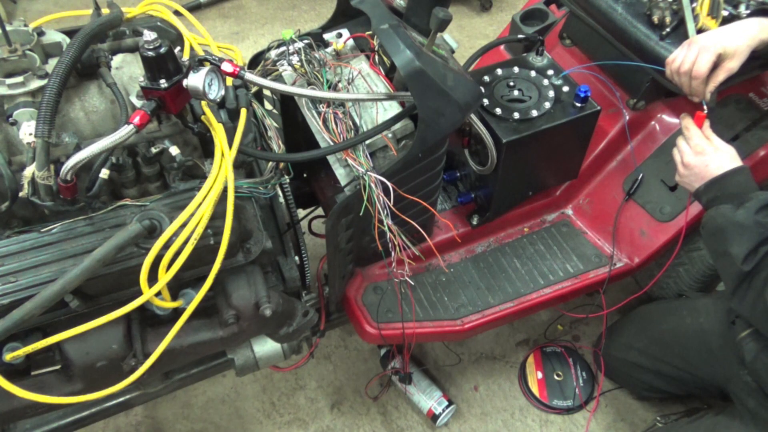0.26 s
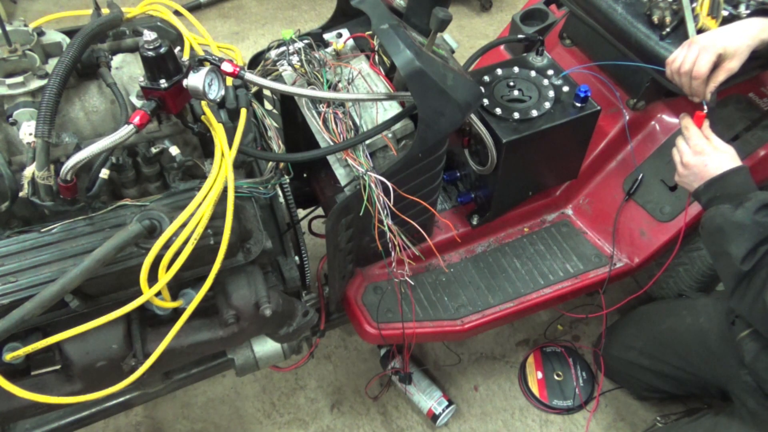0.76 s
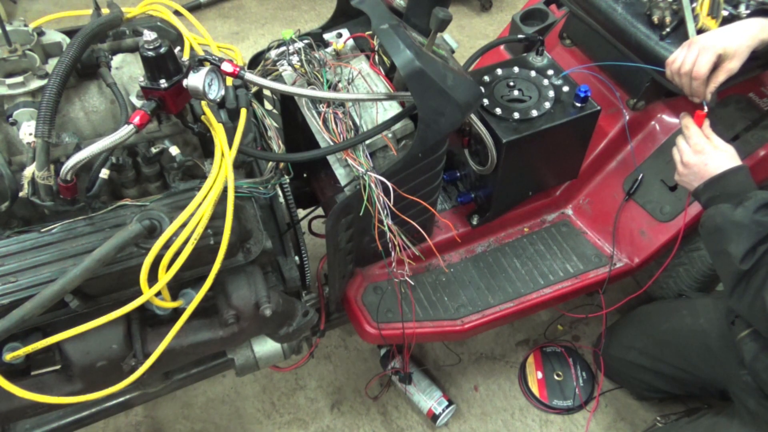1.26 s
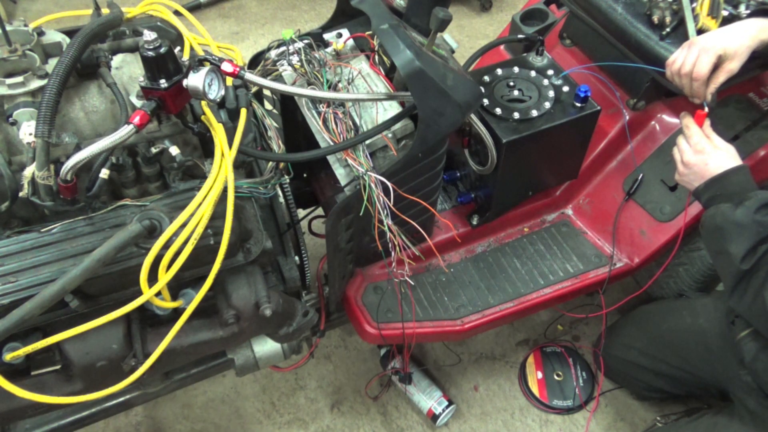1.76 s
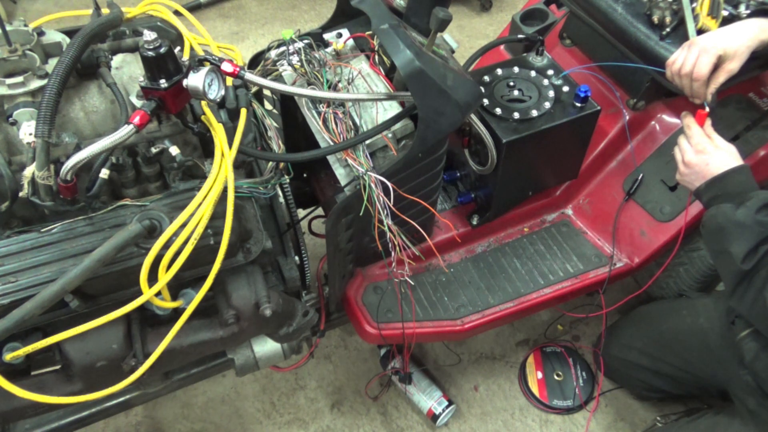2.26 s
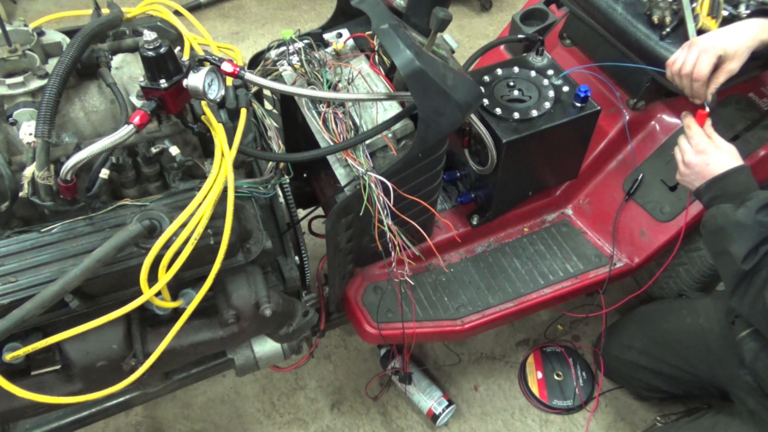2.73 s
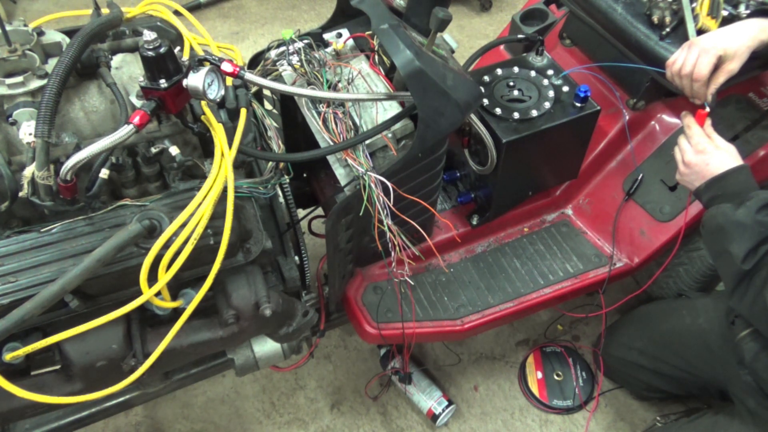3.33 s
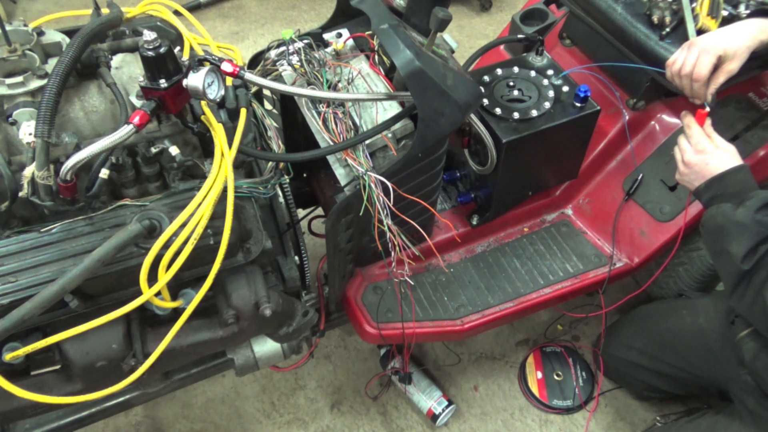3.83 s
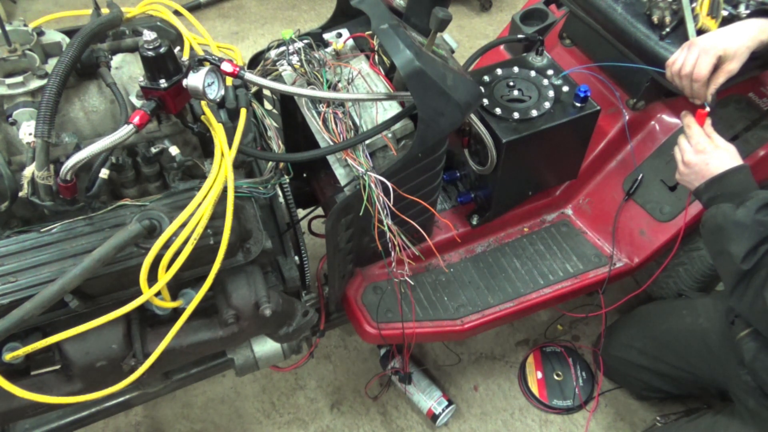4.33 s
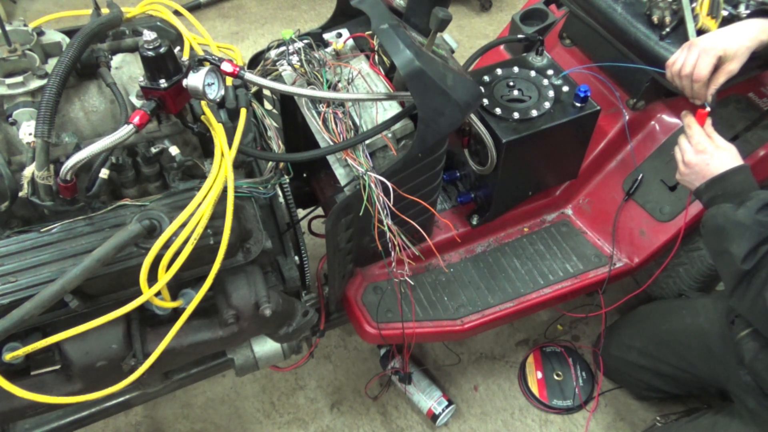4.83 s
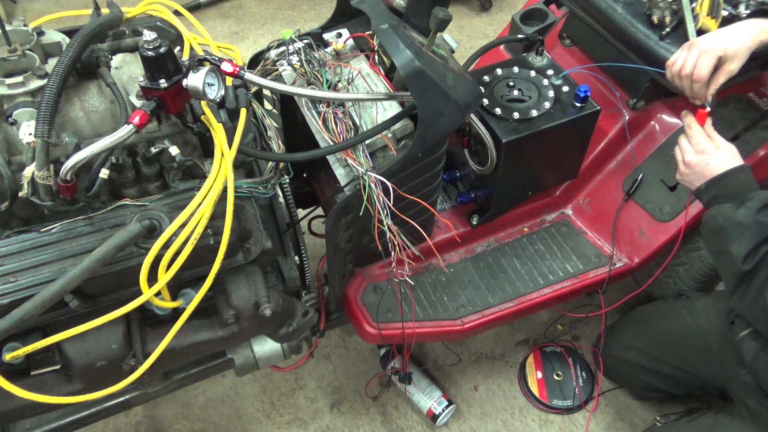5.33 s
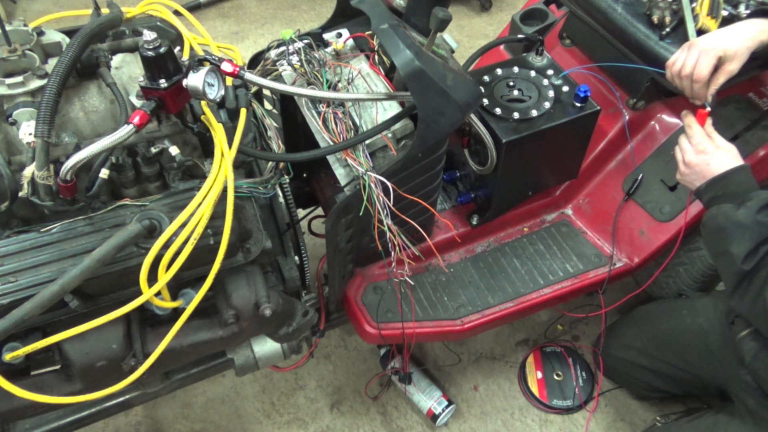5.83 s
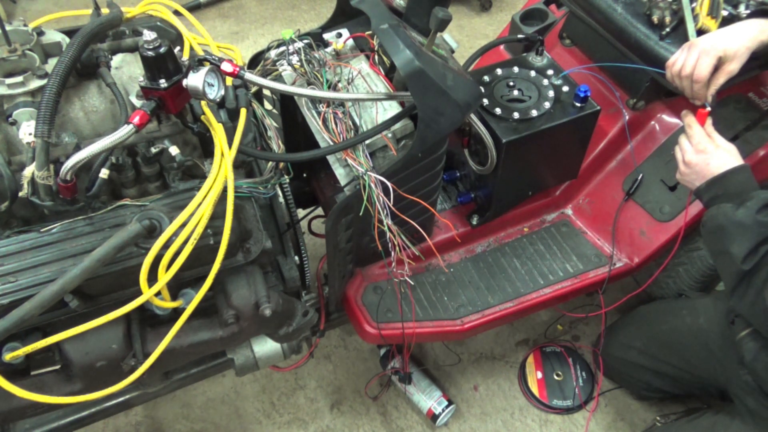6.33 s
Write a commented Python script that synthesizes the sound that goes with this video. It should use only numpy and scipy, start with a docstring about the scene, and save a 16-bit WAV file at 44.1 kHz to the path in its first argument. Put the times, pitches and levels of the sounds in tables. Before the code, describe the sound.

A small electric fuel pump starts in fits, with crackling sparks, thin metallic ticks and light ringing knocks between brief hissing bursts. After nearly two seconds it catches and keeps going, buzzing and whining over a frothy fizz and faint gurgle. Its tone slides gradually downward and levels off near the end as the hiss eases. The sound is fairly close, with slight workshop reflections and faint room noise.

```python
"""In a workshop, an electric fuel pump is run from hand-held wires.
The contact sparks and drops out a few times, then holds: the pump churns air and fuel with a rough hiss.
Its buzz and whine, multiples (orders) of the rotor speed, sink in pitch as pressure builds, then settle.
Fuel tank, body panels and the pump's metal can ring along."""
import sys
import numpy as np
from scipy import signal
from scipy.fft import rfft, irfft
from scipy.io import wavfile
from scipy.ndimage import uniform_filter1d

SR = 44100
rng = np.random.default_rng(int(sys.argv[2]) if len(sys.argv) > 2 else 0)


def to_wav(sig):
    """Store sig (one row per channel, or 1-D mono) as 16-bit WAV at the path in sys.argv[1].

    Samples outside -1..1 are clipped; the rate is SR.
    """
    pcm = np.clip(np.atleast_2d(sig), -1, 1) * 32767
    pcm = np.round(pcm).astype(np.int16)
    wavfile.write(sys.argv[1], SR, pcm.T)  # frames by channels


N = 290178
TIME_S = np.arange(N) / SR
BINS_HZ = np.maximum(np.arange(N // 2 + 1) * SR / N, 1)


def from_db(db):
    """Decibels to gain."""
    return 10 ** (np.asarray(db) / 20)


def unit_rms(x):
    """Scale to rms 1."""
    return x / np.sqrt(np.mean(x ** 2) + 1e-20)


def curves(rows):
    """Each value column of (time [s], values...) at every sample."""
    times_s, *columns = np.transpose(rows)
    return [np.interp(TIME_S, times_s, column) for column in columns]


def colour(points):
    """Gain per bin from (frequency [Hz], level [dB])."""
    hz, db = np.transpose(points)
    return from_db(np.interp(np.log(BINS_HZ), np.log(hz), db))


def resonances(modes):
    """Power per bin from (frequency [Hz], width [Hz], peak [dB])."""
    return sum(from_db(db) ** 2 / (1 + (2 * (BINS_HZ - hz) / width_hz) ** 2)
               for hz, width_hz, db in modes)


def noise(gain):
    """Noise shaped by a gain per bin, rms 1."""
    return unit_rms(irfft(rfft(rng.standard_normal(N)) * gain, N))


def drift(rate_hz):
    """Random wander below about rate_hz, rms 1."""
    hop, warmup = 40, 2000
    pole = np.exp(-2 * np.pi * hop * rate_hz / SR)
    white = rng.standard_normal(N // hop + warmup + 2)
    slow = signal.lfilter([1], [1, -2 * pole, pole * pole], white)[warmup:]
    return np.interp(np.arange(N) / hop, np.arange(len(slow)), unit_rms(slow))


def reflections(x, t60_s):
    """Dense dying echoes of x off the floor and nearby things, unit energy gain."""
    t = TIME_S[:SR // 2]
    echoes = rng.standard_normal(len(t)) * from_db(-60 * t / t60_s) * (t > .002)
    return signal.fftconvolve(x, echoes / np.linalg.norm(echoes))[:N]


def echo_ripple(strength):
    """Gain per bin: echoes off the floor and near panels ripple the spectrum."""
    t = TIME_S[:SR // 60]
    echoes = rng.standard_normal(len(t)) * np.exp(-t / .004) * (t > .002)
    return np.abs(1 + strength * rfft(echoes / np.linalg.norm(echoes), N)) / np.hypot(1, strength)


def stereo(mid, side_db, shift_db):
    """Left and right differ slightly in phase, level and reflections."""
    # stereo width: (frequency [Hz], relative side level [dB])
    width = [(60, -21), (200, -18.5), (330, -22), (500, -25.5), (770, -15), (1170, -8.5), (1790, -14.5),
             (2700, -15.5), (4200, -83), (6400, -78), (8500, -47), (9800, -12.5), (12000, -46),
             (15000, -45)]
    # balance: (frequency [Hz], left minus right [dB])
    balance = [(60, -.3), (300, -.2), (600, .9), (1200, 1.3), (2200, .4), (4500, .1), (8500, -.4),
               (13000, 0)]
    shifted = from_db(shift_db) * 1j * rfft(mid)
    side = from_db(side_db) * colour(width) * (shifted + rfft(reflections(mid, t60_s=.73)))
    lean = np.sqrt(colour(balance))
    return irfft([(rfft(mid) + side) * lean, (rfft(mid) - side) / lean], N)


def workshop(air_db):
    """Still air with a faint mains hum."""
    # room noise: (frequency [Hz], relative density [dB])
    room_spectrum = [(15, -44), (25, -34), (49, -20), (91, -8.5), (241, -6.5), (472, -11), (653, -9),
                     (727, -21), (1000, -9.5), (1350, -12.5), (1920, -13.5), (2650, -17), (15700, -30)]
    # hum lines: (frequency [Hz], rms level [dB])
    hum_lines = [(479, -60.5), (720, -60), (840, -60.5), (1200, -63.5), (1319, -63), (1384, -65),
                 (2638, -68)]
    hum = sum(from_db(db) * np.sqrt(2) * np.cos(2 * np.pi * hz * TIME_S + .09 * drift(14))
              for hz, db in hum_lines)
    return from_db(air_db) * noise(colour(room_spectrum)) + hum


def flow_rumble():
    """Low rumble of the flow."""
    # rumble: (time [s], level [dB])
    levels = [(0, -76), (1.2, -52), (2.2, -62), (3.0, -54), (4.3, -54.5), (5.2, -56), (6.58, -54)]
    level_db, = curves(levels)
    spectrum = [(20, -9), (45, -11), (75, 2.5), (100, -7), (135, 0), (220, -32), (600, -53), (2000, -90)]
    return from_db(level_db) * noise(colour(spectrum))


def mount_rattle(gain_db, grain_db):
    """The unloaded pump shakes unevenly in its mounting."""
    # mounting modes: (frequency [Hz], width [Hz], relative peak [dB])
    modes = [(168, 22, -5), (212, 22, -5), (275, 40, -12), (356, 24, 3), (492, 26, 2), (810, 30, -5),
             (1325, 50, -5), (1480, 50, -5), (1830, 160, -9), (2250, 200, -14)]
    # shaking: (time [s], relative level [dB])
    shake = [(.1, -70), (.125, -38), (.22, -37.5), (.3, -33.5), (.4, -37), (.54, -43), (.63, -39.5),
             (.81, -47), (.89, -37.5), (1.0, -44), (1.15, -66), (1.31, -70), (1.33, -37), (1.46, -48),
             (1.52, -44), (1.63, -49), (1.7, -43), (1.95, -46), (2.1, -75)]
    shake_db, = curves(shake)
    highpass = 1 / np.sqrt(1 + (140 / BINS_HZ) ** 16)
    envelope = from_db(gain_db + shake_db + grain_db * drift(40))
    return envelope * noise(np.sqrt(resonances(modes)) * highpass)


def wire_ticks():
    """The wire end flicks the terminal: thin metallic ticks."""
    # flicks: (time [s], level [dB])
    flicks = [(0.765, -33), (1.018, -33), (1.488, -36)]
    # terminal modes: (frequency [Hz], relative level [dB], t60 [s])
    modes = [(4750, -9, .05), (6380, 0, .06), (6620, -4, .05), (7150, -3, .07), (8400, -9, .04)]
    out, t = np.zeros(N), TIME_S[:SR // 5]
    tick = sum(from_db(db - 60 * t / t60_s) * np.sin(2 * np.pi * hz * t) for hz, db, t60_s in modes)
    for at_s, level_db in flicks:
        start = round(at_s * SR)
        out[start:start + len(t)] += from_db(level_db) * tick
    return out


def sparks_and_jolts(can, crack_db):
    """The contact snaps as it makes or breaks; the kicking rotor knocks the can on its mounting."""
    # jolts: (time [s], thud [dB], snap [dB], t60 [s], ring [dB], rise [s])
    jolts = [(0.097, -24, -23, 0.09, -30, 0.0011), (0.765, -42, -35.5, 0.12, -60, 0.0014),
             (0.834, -29.5, -38, 0.28, -43, 0.0035), (0.877, -48, -28, 0.16, -32, .004),
             (1.019, -43, -38.5, 0.11, -55, .0012), (1.311, -29, -34.5, 0.14, -22, .002),
             (1.36, -28, -25.5, 0.15, -33, 0.0069), (1.489, -34, -33.5, 0.38, -50, .0012),
             (1.534, -36, -27, 0.072, -39, .005), (1.642, -29, -32, 0.095, -36, .0012),
             (1.683, -25, -24, 0.11, -34, 0.0081)]
    # rotor thud: (frequency [Hz], relative density [dB])
    thud_spectrum = [(100, -19), (180, 27), (270, -21), (370, 14), (780, 6), (1100, 13), (1900, 4.5),
                     (3000, 0), (6000, -51)]
    # spark snap: (frequency [Hz], relative density [dB])
    snap_spectrum = [(1200, -3), (2500, 14), (4600, 14.5), (5500, 14.5), (6500, 13), (8300, 2.5),
                     (10500, 1), (16000, -28)]
    # pump and tank modes: (frequency [Hz], relative level [dB], t60 [s])
    modes = [(168, -24.5, 2.9), (376, -12, .55), (488, -14, .7), (600, -8, .3), (705, -2, .14),
             (824, -7, .09), (1104, -10, .1), (1324, -10, .14), (1480, -10, .09), (1852, -8, .06)]
    thud, snap = noise(colour(thud_spectrum) * can), noise(colour(snap_spectrum) * can)
    bursts, kicks, t = np.zeros(N), np.zeros(N), TIME_S[:SR]
    for at_s, thud_db, snap_db, t60_s, ring_db, rise_s in jolts:
        age_s = np.maximum(TIME_S - at_s, 0)
        envelope = np.minimum(age_s / rise_s, 1) * from_db(-60 * age_s / t60_s)
        crack = 1 + from_db(crack_db) * np.exp(-age_s / .001)
        bursts += envelope * (from_db(thud_db) * thud + from_db(snap_db) * crack * snap)
        kicks[round(at_s * SR)] = from_db(ring_db)
    ring = sum((-1) ** k * from_db(db - 60 * t / t60_s) * np.sin(2 * np.pi * hz * t)
               for k, (hz, db, t60_s) in enumerate(modes))
    highpass = signal.butter(2, 230, "high", fs=SR, output="sos")  # the small can radiates no bass
    return signal.sosfilt(highpass, bursts) + signal.fftconvolve(kicks, ring)[:N]


def whistles_and_squeals():
    """Pump whistles and short squeals, many of them rotor orders flaring: thin bands swell, glide, die."""
    # whistles: (start [s], end [s], pitch [Hz], glide [Hz/s], width [Hz], level [dB])
    whistles = [(.12, .25, 9190, 0, 50, -47), (.17, .32, 15100, 0, 260, -48),
                (.17, .35, 9850, 700, 130, -43.5), (.3, .56, 9850, 700, 150, -45),
                (.39, .5, 13300, 0, 70, -52), (.55, .78, 10080, 500, 180, -49),
                (1.72, 2.35, 9250, -100, 70, -48), (2.42, 2.72, 7540, -300, 35, -44),
                (2.42, 2.72, 10040, -300, 40, -46), (3.0, 3.35, 7840, -200, 40, -40),
                (3.35, 4.7, 6450, 0, 70, -43), (3.55, 3.85, 7190, -300, 40, -42),
                (4.22, 4.5, 7980, -500, 40, -42), (5.19, 5.36, 8330, -2000, 50, -44),
                (2.15, 2.48, 1845, -10, 10, -39.5), (2.18, 2.46, 2345, 0, 70, -42),
                (3.3, 3.65, 1285, -25, 8, -39.5), (3.5, 4.45, 8370, -60, 140, -41),
                (5.7, 6.57, 6320, 0, 25, -44), (5.7, 6.57, 9340, 0, 60, -48)]
    out = np.zeros(N)
    for start_s, end_s, hz, glide_hz_per_s, width_hz, db in whistles:
        span = slice(round(start_s * SR), round(end_s * SR))
        t = TIME_S[span] - start_s
        white = rng.standard_normal(len(t)) + 1j * rng.standard_normal(len(t))
        band = signal.lfilter([1], [1, -np.exp(-np.pi * width_hz / SR)], white)
        carrier = np.exp(2j * np.pi * (hz + glide_hz_per_s * t / 2) * t)
        out[span] += from_db(db) * signal.windows.tukey(len(t), .5) * unit_rms(np.real(band * carrier))
    return out


def dry_sizzle(level_db, grain_db):
    """High, grainy sizzle while the pump first spins dry."""
    swell = np.interp(TIME_S, [.11, .2, .48, .54, .63, .76], [.033, 1, 1, .3, .94, .07])
    grains = unit_rms(from_db(grain_db * drift(250)))
    return from_db(level_db) * swell * grains * noise(colour([(6000, -32), (12000, -3), (15200, -8)]))


def bubble_shimmer(x, depth_db, patch_hz, patch_s):
    """Passing bubbles open and close narrow resonances in the treble of x."""
    hz, times_s, cells = signal.stft(x, SR, nperseg=1024)
    patches = rng.standard_normal(cells.shape)
    for axis, size in 2 * [(0, round(patch_hz / hz[1])), (1, round(patch_s / times_s[1]))]:
        patches = uniform_filter1d(patches, size, axis=axis)
    gain = from_db(np.interp(hz, [3000, 6000], [0, depth_db])[:, None] * unit_rms(patches))
    gain /= np.sqrt(np.mean(gain ** 2, axis=1, keepdims=True))
    return signal.istft(cells * gain, SR)[1][:N]


def contact(on_s, off_s, rise_s, fall_db_per_s):
    """Envelope: rises while current flows, dies as the rotor coasts."""
    rise = 1 - np.exp(-np.maximum(TIME_S - on_s, 0) / rise_s)
    return rise * from_db(-fall_db_per_s * np.maximum(TIME_S - off_s, 0))


def flow_gains(hold_s, prime_s):
    """Gains of gurgle, rattle, hiss and fizz: a spurt per touch of the wire, steady flow from hold_s."""
    # touches: (on [s], off [s], gurgle and rattle offset [dB], hiss and fizz offset [dB], rise [factor])
    touches = [(0.097, 0.466, -1.2, 1, 0.44), (0.532, 0.647, -4.8, 1, 1.9), (0.825, 0.914, -7, -0.77, 1.3),
               (1.316, 1.38, -5.5, -0.17, 0.54), (1.49, 1.556, -6.5, -0.71, 1)]
    # spurt in each of the four bands: (relative level [dB], base rise [s], coasting fall [dB/s])
    spurt_bands = [(-29.5, 0.0092, 75), (-35, 0.041, 128), (-38, 0.041, 107), (-42, 0.024, 139)]
    # gurgle of trapped air: (time [s], relative level [dB])
    gurgle = [(1.72, -33), (1.85, -35), (1.94, -31), (2.08, -40.5), (3.3, -39.5), (4.45, -49), (5.1, -44),
              (5.5, -47), (6.58, -45.5)]
    # fuel and air flow: (time [s], relative hiss [dB], relative fizz [dB])
    flow = [(1.72, -34, -35.5), (2.4, -33, -34.5), (3.0, -30, -31), (3.7, -32, -28.5), (4.2, -31.5, -30),
            (4.7, -31.5, -30.5), (5.15, -34, -33.5), (5.7, -36.5, -34.5), (6.58, -37.5, -35.5)]
    (gurgle_db,), (hiss_db, fizz_db) = curves(gurgle), curves(flow)
    rattle_db = -36.5 + .62 * (hiss_db - hiss_db.mean())
    held, gains = contact(hold_s, TIME_S[-1], prime_s, 0), []
    for band, steady_db in enumerate([gurgle_db, rattle_db, hiss_db, fizz_db]):
        level_db, rise_s, fall_db_per_s = spurt_bands[band]
        spurts = [from_db(level_db + (low_db if band < 2 else high_db))
                  * contact(on_s, off_s, slowness * rise_s, fall_db_per_s)
                  for on_s, off_s, low_db, high_db, slowness in touches]
        gains.append(np.max(spurts + [from_db(steady_db) * held], axis=0))
    return gains


def churn(angle, can, gain_db, turn_db, roller_db, sputter_db, grain_db):
    """Froth bursts at each of five rollers, stronger once a turn, and sputters as air pockets pass."""
    # froth: (frequency [Hz], relative density [dB])
    spectrum = [(130, -55), (190, -2), (270, -19.5), (350, 3.5), (500, 0.5), (750, -1.5), (1050, -8),
                (1900, -8.5), (2900, -9.5), (5000, -11), (8500, -11.5), (10200, -14), (12000, -18.5),
                (16000, -24)]
    # limits of gurgle, rattle, hiss and fizz: (frequency [Hz])
    edges_hz = [130, 1000, 3000, 7000, 17000]
    pulse_db = turn_db * np.cos(angle) + roller_db * np.cos(5 * angle)
    pulses = from_db(pulse_db + sputter_db * drift(16) + grain_db * drift(500))
    shape, out = colour(spectrum) * can, 0
    for gain, low_hz, high_hz in zip(flow_gains(hold_s=1.65, prime_s=.022), edges_hz, edges_hz[1:]):
        bandpass = 1 / np.sqrt((1 + (low_hz / BINS_HZ) ** 16) * (1 + (BINS_HZ / high_hz) ** 16))
        out += gain * noise(shape * bandpass)
    return from_db(gain_db) * out * unit_rms(pulses)


def roller_whine(speed_hz, angle, air, can, waver_db, comb_db):
    """High orders of the five rollers flare in the can's resonances, over a faint comb of orders."""
    # roller lines: (order, relative level [dB])
    orders = [(45, -57), (50, -53), (70, -55), (75, -56), (85, -52), (95, -53), (110, -52), (115, -51),
              (135, -51), (140, -56), (155, -49)]
    response, lines = can ** 2 / 2 / np.sqrt(1 + (BINS_HZ / 10000) ** 16), 0
    for order, db in orders:
        swell = from_db(db + waver_db * air * drift(1.5)) * np.interp(order * speed_hz, BINS_HZ, response)
        lines += swell * np.cos(order * angle + 2 * np.pi * rng.random())
    comb_orders = np.arange(4097)
    phases = np.exp(2j * np.pi * rng.random(len(comb_orders)))
    one_turn = unit_rms(irfft(((comb_orders > 40) & (comb_orders < 130)) * phases))
    comb = np.interp(angle / (2 * np.pi) % 1, np.linspace(0, 1, len(one_turn)), one_turn)
    primed = np.interp(TIME_S, [1.68, 1.8, 3.1, 4.6, 5.8], [0, .6, 1.3, 1.2, .55])
    return primed * (np.sqrt(2) * lines + from_db(comb_db) * irfft(rfft(comb) * can, N))


def rotor_buzz(speed_hz, angle, air, gain_db, waver_db, scatter_rad):
    """The weaker rotor orders swell as they slide through resonances of tank, panels and room."""
    # forces on the mounting: (order, relative level [dB])
    orders = [(2, -0.5), (3, -5), (11, -2), (13, -1), (14, -3), (17, 1), (19, -13), (21, 0), (23, -13),
              (24, -2), (26, -4), (27, 0.5), (28, -10), (29, 2.5), (31, -1.5), (32, 1.5), (33, -5), (35, 8),
              (36, 2.5), (37, 5.5), (38, -0.5), (40, 9.5)]
    # tank, panel and room modes: (frequency [Hz], width [Hz], peak [dB])
    modes = [(173.3, 6.3, -12), (205.3, 9.3, -5.5), (286, 0.54, -46), (662, 5.5, -6.5), (700, 6, -12),
             (771, 27, -4), (850, 79, -11), (1024, 43, -11.5), (1295, 51, -26), (1370, 13, -22),
             (1513, 12.5, -4), (1700, 69, -22.5), (1839, 21, -5.5), (1960, 88, -14), (2208, 54, -15.5),
             (2515, 180, -19.5)]
    # buzz strength: (time [s], relative level [dB])
    levels = [(1.75, -31), (2.0, -29.5), (2.5, -28.5), (3.0, -29), (3.5, -28), (4.0, -28), (4.6, -27),
              (5.0, -33.5), (5.4, -33), (5.8, -32), (6.58, -30.5)]
    level_db, = curves(levels)
    body, out = np.sqrt(resonances(modes)), 0
    for order, db in orders:
        swell = from_db(db + waver_db * air * drift(6.2)) * np.interp(order * speed_hz, BINS_HZ, body)
        phase = scatter_rad * np.sqrt(order) * rng.standard_normal()
        out += swell * np.cos(order * angle + phase)
    return np.sqrt(2) * from_db(gain_db + level_db) * out


def motor_tones(speed_hz, angle, play_rad, air, waver_db, flutter_db, scatter_rad):
    """Strong roller and commutator orders ring the mounting and motor shell; the high ones flutter."""
    # mounting and shell modes: (driving order, frequency [Hz], width [Hz], peak [dB])
    modes = [(4, 272.7, 3.0, -40.1), (4, 295.6, 14.0, -51.9), (4, 322.3, 6.1, -40.2),
             (5, 299.0, 5.0, -45.0), (5, 351.3, 5.0, -34.3), (5, 370.4, 4.6, -29.6),
             (5, 389.8, 16.1, -34.5), (5, 404.3, 3.0, -33.8), (5, 411.0, 3.0, -33.9),
             (5, 417.1, 3.0, -32.7), (6, 370.0, 15.7, -36.0), (6, 451.3, 14.0, -33.5),
             (6, 486.7, 12.5, -25.0), (6, 494.9, 4.9, -34.6), (7, 451.5, 18.0, -37.1),
             (7, 483.3, 23.0, -39.3), (7, 542.6, 6.9, -35.1), (7, 569.4, 5.0, -33.6),
             (7, 591.2, 6.0, -34.6), (8, 492.0, 15.9, -32.3), (8, 537.2, 20.0, -36.6),
             (8, 567.3, 3.0, -45.3), (8, 609.8, 24.2, -34.5), (8, 644.1, 6.3, -33.6),
             (8, 658.1, 7.0, -33.6), (9, 543.4, 9.3, -35.4), (9, 570.4, 7.7, -42.5),
             (9, 607.9, 17.8, -38.7), (9, 646.6, 35.3, -39.9), (9, 710.6, 9.5, -27.2),
             (10, 746.7, 12.0, -34.4), (10, 765.4, 7.4, -30.4), (10, 781.9, 6.6, -35.3),
             (10, 819.3, 16.1, -38.1), (10, 848.4, 15.8, -34.2), (12, 794.6, 51.6, -39.2),
             (12, 962.3, 9.3, -36.0), (12, 977.4, 5.7, -40.1), (15, 974.8, 70.0, -39.5),
             (15, 1153.2, 70.0, -45.6), (15, 1195.7, 6.9, -43.3), (15, 1275.4, 47.5, -44.8),
             (16, 1067.8, 74.0, -50.2), (16, 1281.9, 72.9, -41.4), (18, 1207.4, 82.0, -45.0),
             (18, 1499.0, 31.5, -40.8), (20, 1330.3, 71.8, -43.7), (20, 1503.1, 19.2, -31.8),
             (20, 1608.2, 13.3, -45.6), (20, 1640.9, 15.6, -42.0), (22, 1517.1, 14.1, -43.6),
             (22, 1823.0, 98.0, -40.7), (25, 1462.2, 110.0, -38.0), (25, 1683.8, 110.0, -47.1),
             (25, 1921.4, 110.0, -41.8), (30, 1851.9, 36.7, -33.5), (30, 1927.0, 32.0, -39.1),
             (30, 2158.0, 7.5, -39.5), (30, 2219.9, 45.5, -37.1), (30, 2379.4, 99.1, -41.6),
             (30, 2516.3, 12.2, -44.4), (60, 3870.5, 120.0, -38.6), (60, 4091.5, 137.9, -39.5),
             (60, 4295.2, 68.4, -37.1), (60, 4432.8, 41.6, -47.3), (60, 4516.3, 38.4, -35.4),
             (60, 4673.6, 56.1, -38.0), (60, 4802.6, 50.4, -35.8), (60, 4896.1, 15.0, -32.3),
             (60, 5002.5, 28.1, -48.8), (80, 5899.1, 96.2, -46.9), (80, 6311.0, 178.7, -41.6),
             (90, 5446.7, 53.0, -48.6), (90, 7071.8, 133.4, -37.3), (90, 7449.6, 72.7, -47.7),
             (90, 7520.0, 20.0, -44.0), (100, 6028.5, 54.6, -47.6), (100, 6414.5, 66.8, -45.0),
             (100, 7601.1, 410.0, -43.0), (105, 6326.7, 63.2, -44.3), (105, 6938.8, 140.5, -45.3),
             (105, 7806.0, 55.2, -37.0), (105, 7999.7, 430.0, -41.3), (120, 8069.0, 326.7, -42.0),
             (120, 8610.9, 38.6, -45.1), (120, 9527.6, 233.5, -43.4)]
    # cancellation by the floor echo: (order, frequency [Hz], width [Hz])
    nulls = [(4, 330, 3), (5, 358, 3), (6, 411, 5), (7, 459, 4), (8, 629, 3), (8, 507, 3), (9, 752, 4),
             (10, 799, 6)]
    # high orders, rising as the pump primes: (time [s], gain [dB])
    treble = [(1.8, -8), (2.12, -6), (2.2, -2), (2.9, -2), (3.1, 0), (3.5, -1), (4.3, .5), (5.3, .5),
              (5.55, -1.5), (5.9, -1), (6.58, -1.2)]
    # uneven running against rising pressure: (time [s], unevenness [factor])
    strain = [(4.6, 1), (4.9, 2.4), (5.55, 2.4), (5.8, 1)]
    treble_db, = curves(treble)
    unevenness = air * curves(strain)[0]
    fuel_load = np.interp(TIME_S, [2.0, 2.8], [.3, 1])
    hop, out = 8, 0
    coarse_s, coarse_rate_hz = TIME_S[::hop], SR / hop
    for order in sorted({mode[0] for mode in modes}):
        force, ringing = np.exp(1j * order * angle[::hop]), 0
        for hz, width_hz, db in (mode[1:] for mode in modes if mode[0] == order):
            radius = np.exp(-np.pi * width_hz / coarse_rate_hz)
            pole = radius * np.exp(2j * np.pi * hz / coarse_rate_hz)
            ringing += from_db(db) * (1 - radius) * (signal.lfilter([1], [1, -pole], force) - force / 2)
        swell = np.interp(TIME_S, coarse_s, np.abs(ringing)) * (fuel_load if 5 < order < 11 else 1)
        for hz, width_hz in (null[1:] for null in nulls if null[0] == order):
            detune_hz = order * speed_hz - hz
            swell *= np.abs(detune_hz) / np.hypot(detune_hz, width_hz)
        if order >= 60:
            swell *= from_db(treble_db + flutter_db * drift(14))
        else:
            swell *= from_db(waver_db * unevenness * drift(9))
        lag = np.interp(TIME_S, coarse_s, np.unwrap(np.angle(ringing / force)))
        phase = scatter_rad * np.sqrt(order) * rng.standard_normal()
        out += np.sqrt(2) * swell * np.cos(order * (angle + play_rad) + lag + phase)
    return out + .19 * unevenness * reflections(out, t60_s=.6)  # passing pitches linger in the room


def scene():
    """One rotor drives buzz, whine and churning, over the workshop background."""
    # rotor: (time [s], speed [Hz])
    speeds = [(1.8, 84.26), (1.84, 84.96), (1.88, 84.96), (1.96, 85.65), (2.0, 85.49), (2.08, 84.38),
              (2.2, 83.58), (2.28, 83.9), (2.4, 83.63), (2.44, 83.24), (2.56, 83.56), (2.64, 82.8),
              (2.76, 82.96), (2.8, 83.36), (2.88, 82.45), (3.04, 82.59), (3.2, 81.78), (3.24, 80.95),
              (3.36, 79.98), (3.64, 79.67), (3.92, 78.34), (4.4, 75.05), (4.52, 74.63), (5.04, 69.71),
              (5.2, 68.6), (5.24, 68.21), (5.32, 66.36), (5.4, 65.17), (5.6, 63.2), (5.72, 60.71),
              (5.88, 60.13), (6.5, 60.18)]
    # modes of the metal can: (frequency [Hz], width [Hz], relative peak [dB])
    can_modes = [(1310, 60, -1), (1507, 60, 1), (1852, 150, 3), (2239, 60, 1), (2412, 160, 1),
                 (3359, 140, 5), (3833, 90, 0), (4091, 130, 2.5), (4651, 100, 0), (4953, 120, 1),
                 (5426, 140, 2), (5960, 140, -1), (6340, 180, 4.5), (7030, 230, 3.5), (7795, 220, 3),
                 (8250, 200, -1), (8786, 130, 0), (9280, 190, 1), (10034, 150, -1), (10379, 200, 0)]
    speed_hz, = curves(speeds)
    air = np.interp(TIME_S, [5.3, 5.8], [1, .3])  # air pockets jog speed and level until flushed out
    angle = 2 * np.pi * np.cumsum(speed_hz * (1 + .0007 * air * drift(26))) / SR
    can = np.sqrt(1 + from_db(2) * resonances(can_modes))
    can_in_room = can * echo_ripple(strength=.3)
    running = np.interp(TIME_S, [1.65, 1.85], [0, 1])
    buzz = rotor_buzz(speed_hz, angle, air, gain_db=-1, waver_db=2, scatter_rad=.37)
    play_rad = .0025 * air * drift(60)  # roller play roughens the highest orders
    tones = motor_tones(speed_hz, angle, play_rad, air, waver_db=1.2, flutter_db=2.8, scatter_rad=.41)
    whine = roller_whine(speed_hz, angle + play_rad, air, can, waver_db=2.5, comb_db=-50)
    froth = churn(angle, can_in_room, gain_db=-.5, turn_db=.5, roller_db=1, sputter_db=.34, grain_db=.67)
    froth += dry_sizzle(level_db=-45, grain_db=3)
    froth = bubble_shimmer(froth, depth_db=2.1, patch_hz=130, patch_s=.09)
    pump = running * (buzz + tones) + whine + froth + flow_rumble() + whistles_and_squeals()
    pump += sparks_and_jolts(can_in_room, crack_db=-27) + wire_ticks()
    pump += mount_rattle(gain_db=.5, grain_db=1.5)
    return stereo(pump + workshop(air_db=-51), side_db=-1, shift_db=-8)


def record(dry):
    """Steep low-pass."""
    cutoff_hz = 15800
    return irfft(rfft(dry) / np.sqrt(1 + (BINS_HZ / cutoff_hz) ** 400), N)


dry = scene()
out = record(dry)
to_wav(out)
```